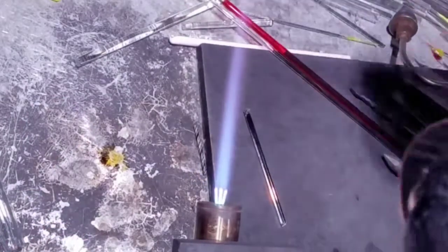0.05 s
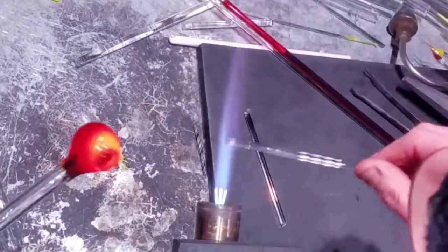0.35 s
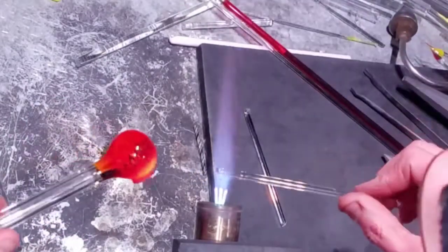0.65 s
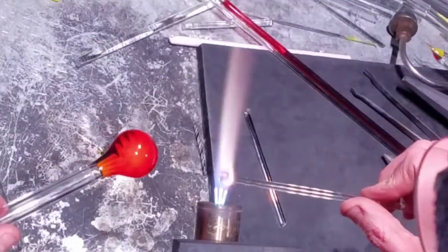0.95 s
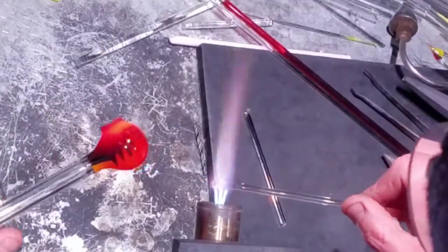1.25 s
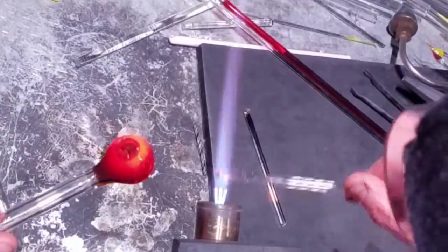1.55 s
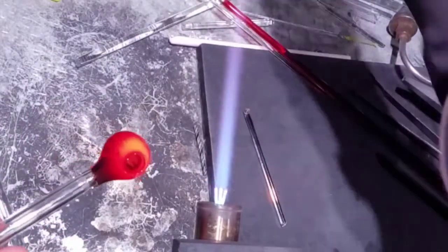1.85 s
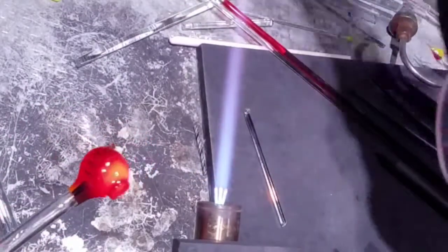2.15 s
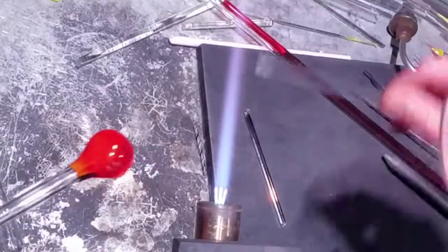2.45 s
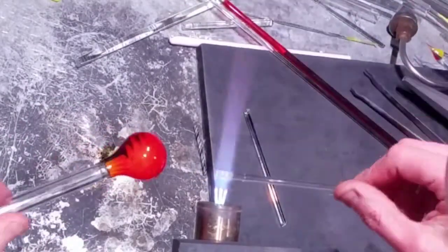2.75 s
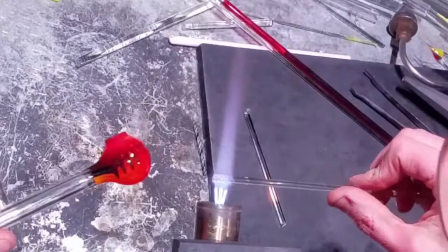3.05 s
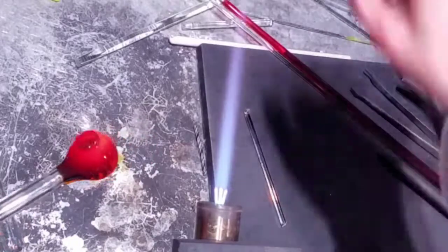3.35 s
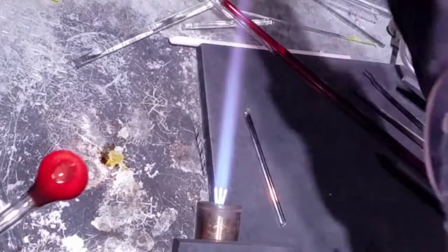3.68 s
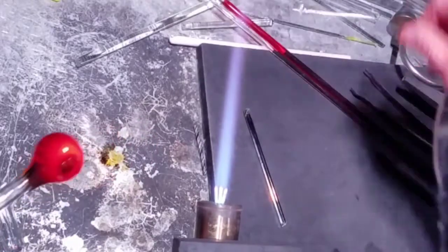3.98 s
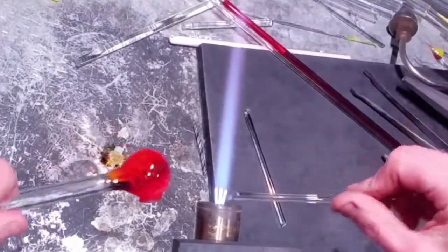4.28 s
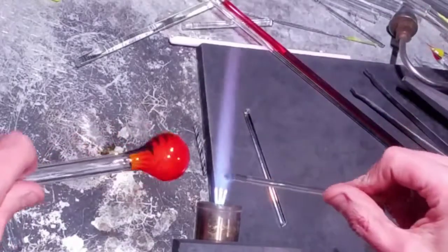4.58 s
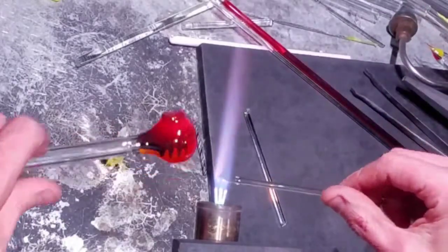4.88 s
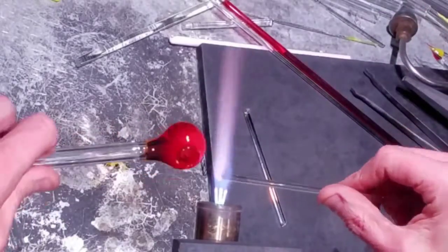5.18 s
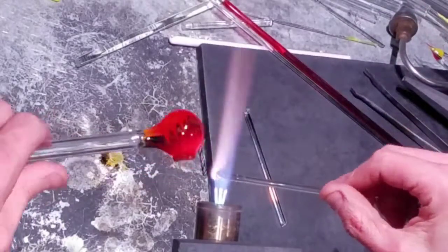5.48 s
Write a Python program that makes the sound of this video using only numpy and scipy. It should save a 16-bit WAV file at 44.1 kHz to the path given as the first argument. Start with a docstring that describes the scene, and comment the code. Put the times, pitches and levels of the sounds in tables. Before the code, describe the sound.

Glass rods drop and clink three times on a workbench, with light ticks and scrapes over a small torch's steady hiss.

```python
"""A small workshop, close to the bench, on a camera's stereo microphones; a small torch hisses throughout.
At once a glass rod drops against other glass and sets it ringing. Near 2 s rods tick and slide, and a
second drops. Around 3.5 s they knock and scrape on the bench, and a third drops just before 4 s.
After each loud clink the camera's gain control ducks the hiss and lets it swell back; meanwhile
the flame flares a little as a cold rod enters it."""
import sys
import numpy as np
from scipy import signal
from scipy.fft import rfft, irfft
from scipy.io import wavfile
from scipy.ndimage import uniform_filter1d, minimum_filter1d

SR = 44100
rng = np.random.default_rng(int(sys.argv[2]) if len(sys.argv) > 2 else 0)


def digitize_waveform(pressure):
    """Quantize a signal to 16-bit integers and store it at the path in sys.argv[1].

    Rows of a 2-D input are taken as channels; values are limited to [-1, 1].
    """
    field = np.atleast_2d(pressure).T
    bounded = np.clip(field, -1, 1)
    quanta = np.round(bounded * 32767).astype(np.int16)
    wavfile.write(sys.argv[1], SR, quanta)


N = 248266
TIME = np.arange(N) / SR
BINS = np.fft.rfftfreq(N, 1 / SR)

# A rod drops on the other glass. Each row: start in seconds, then ring, weight on the bench and
# chatter in dB, then the delay of the rebound in seconds.
DROPS = [(-.008, 1.5, -7.5, -3.5, 0.0094), (2.2912, 1, -14, -1.5, .01), (3.9184, -1.5, -2, -0.5, .006)]
# A rod knocks on the bench. Each row: start in seconds, ring of the bench in dB, crack in dB.
BENCH_KNOCKS = [(3.4695, -28.5, -20), (3.6624, -44.5, -24.5)]
# How alike the two microphones hear. Each row: frequency in Hz, correlation from 0 to 1.
MIC_LIKENESS = [(60, .93), (130, .92), (290, 0.84), (640, 0.5), (1400, 0), (15000, 0)]


def amp(db):
    """Decibels to gain."""
    return 10 ** (np.asarray(db) / 20)


def unit(x):
    """Scales to rms 1."""
    return x / np.sqrt(np.mean(x ** 2) + 1e-20)


def read(points, hz):
    """Reads a table on a log-frequency axis."""
    f, value = np.transpose(points)
    return np.interp(np.log(hz + 1), np.log(f + 1), value)


def add(mix, start, sound):
    """Mixes a stereo sound in at a start in seconds."""
    at = round(start * SR)
    sound = sound[:, max(-at, 0):]
    part = mix[:, max(at, 0):][:, :sound.shape[1]]
    part += sound[:, :part.shape[1]]


def pair(x, db=0):
    """Colours two unrelated signals and makes their bass alike, as at two closely spaced microphones."""
    hz = np.fft.rfftfreq(x.shape[1], 1 / SR)
    left, other = rfft(x)
    same = np.clip(read(MIC_LIKENESS, hz), -1, 1)
    right = same * left + np.sqrt(1 - same ** 2) * other
    return irfft(np.array([left, right]) * amp(db), x.shape[1])


def stroke(start, attack_s, length_s, t60):
    """Envelope of one movement: it rises, and dies away once its length is over."""
    t = TIME - start
    return np.clip(t / attack_s, 0, 1) * amp(-60 * np.maximum(t - length_s, 0) / t60)


def ring(hz, db, t60, fill_s, waver):
    """One dying mode; it builds up as its reflections gather, and their sum wavers at each microphone."""
    t = np.arange(int(SR * min(t60, 1))) / SR
    apart = np.sqrt(1 - np.clip(read(MIC_LIKENESS, hz), 0, 1))
    phase = 2 * np.pi * rng.random() + apart * rng.choice([-1, 1]) * np.array([[-1], [1]]) * np.pi / 4
    knots, knot_s = rng.standard_normal((2, 2, 90)), np.linspace(0, 1, 90)
    swell, slip = (np.array([np.interp(t, knot_s, mic) for mic in both]) for both in knots)
    envelope = amp(db - 60 * t / t60) * (1 - np.exp(-t / fill_s))
    return envelope * (1 + waver * swell) * np.cos(2 * np.pi * hz * t + phase + waver * slip)


def clinks():
    """The same glass is struck at three places, so each clink favours other modes."""
    # Each row: pitch in Hz, free t60 in seconds, relative dB in the first, second and third clink.
    glass_modes = [(2077, .3, -37, -26, -29), (2239, .33, -27, -19, -25), (2266, 1.15, -26, -27, -30),
                   (2299, .38, -17, -17, -25), (2331, .42, -18, -18, -14), (2372, .29, -16, -16, -23),
                   (2406, .33, -26, -17, -31), (2445, .29, -6, -1, -12), (2654, .37, -17, -18, -15),
                   (2670, .37, -21, -15, -23), (2836, .3, -16, -5, 2), (2860, .35, -8, -3, -6),
                   (2997, .3, -30, -21, -25), (3122, .85, -36, -28, -22), (3465, .33, -12, -13, -17),
                   (3481, .33, -13, -17, -14), (3595, .47, -25, -24, -28), (4002, .41, -16, -23, -17),
                   (4204, .32, -23, -16, -22), (4354, .45, -20, -16, -28), (4655, .32, -19, -18, -23),
                   (4785, .35, -35, -26, -44), (4936, .28, -11, -24, -27), (6578, .29, -31, -32, -26),
                   (7633, .3, -27, -26, -26), (7720, .3, -32, -31, -28), (10767, .24, -44, -39, -29),
                   (14432, .24, -38, -27, -20), (14475, .27, -36, -19, -29)]
    out = np.zeros((2, N))
    for hz, t60, *levels in glass_modes:
        neighbour_t60 = 1.28 * (2420 / hz) ** 0.55
        for (start, strength_db, *_), mode_db in zip(DROPS, levels):
            db = mode_db + strength_db
            # Rough and damped while the pieces touch, then free and clean, then the neighbouring glass.
            add(out, start, ring(hz, db - 3.5, t60=0.061, fill_s=0.00053, waver=0.54))
            add(out, start, ring(hz, db, t60, fill_s=0.011, waver=0.35))
            add(out, start, ring(hz, db - 30.5, neighbour_t60, fill_s=0.075, waver=0.089))
    return out


def chatter(room, start, db, tint, t60, room_db, rise_s=0.000096):
    """Hard glass chatters at a contact: a wide burst that the room prolongs. Gives (start, sound)."""
    # Colour common to all contacts. Each row: frequency in Hz, gain in dB.
    colour = [(30, -17), (170, -5), (380, 10), (1000, 3), (1500, 5), (2400, 6), (4400, 4.5), (5600, 1),
              (7600, 7.5), (9500, -2.5), (12000, 6), (14400, 9)]
    t, lead_s = np.arange(SR // 2) / SR, 0.01
    hz = np.fft.rfftfreq(len(t), 1 / SR)
    rise = np.clip((t - lead_s) / rise_s, 0, 1)
    envelope = rise * amp(db - 60 * np.maximum(t - lead_s - rise_s, 0) / t60)
    burst = pair(rng.standard_normal((2, len(t))) * envelope, read(colour, hz) + read(list(tint), hz))
    sound = amp(room_db) * reverberate(burst, room)
    add(sound, 0, burst)
    return start - lead_s, sound


def contacts(room):
    """A drop strikes and rebounds, a knock cracks and rattles, a touch ticks once."""
    # Colours of a drop's strike and of its rebound. Each row: frequency in Hz, gain in dB.
    strike_tint = [(250, 2.5), (390, -7.5), (600, 2), (950, 2.5), (1300, -4.5), (1700, -0.5), (2600, -4),
                   (4500, -2), (5600, -5.5), (7500, -5.5), (10500, 2), (14000, -7)]
    rebound_tint = [(300, -36), (1300, -31.5), (2000, -3), (2700, -1), (4500, -4.5), (5600, -6.5),
                    (7500, -6), (10500, -12), (14000, -11.5)]
    # Light touches. Each row: start in seconds, strength in dB, brightness in dB, t60 in seconds.
    touches = [(1.9986, -21, 8, 0.037), (2.033, -23, 0, 0.029), (2.048, -19.5, -3, 0.016),
               (2.097, -23, -1.5, 0.014), (2.1552, -14.5, 0, 0.0051), (2.2787, -23.5, 6, .01),
               (3.605, -27.5, 9.5, 0.093), (3.995, -32, -19, 0.04)]
    # Where the thud, click and fizz of a contact lie, in Hz.
    bands_hz = [650, 2570, 8800]
    out = np.zeros((2, N))
    for start, _, weight_db, db, rebound_s in DROPS:
        # A light landing weakens the strike fully below 800 Hz, not at all above 2400 Hz.
        tint = [(hz, level + np.interp(hz, [800, 2400], [weight_db, 0])) for hz, level in strike_tint]
        add(out, *chatter(room, start, db, tint, t60=0.052, room_db=-17.5))
        add(out, *chatter(room, start + rebound_s, db, rebound_tint, t60=0.1, room_db=-5, rise_s=0.00084))
    for start, _, db in BENCH_KNOCKS:
        crack, rattle = zip(bands_hz, (0, 1, -31)), zip(bands_hz, (-11.5, -10.5, -30))
        add(out, *chatter(room, start, db, crack, t60=0.039, room_db=0))
        add(out, *chatter(room, start + 0.009, db, rattle, t60=0.092, room_db=4.6, rise_s=0.0036))
    for start, db, bright_db, t60 in touches:
        tint = zip(bands_hz, (-11.5 - bright_db, 0, -11.5 + bright_db))
        add(out, *chatter(room, start, db, tint, t60, room_db=-0.5, rise_s=0.058 * t60))
    return out


def thuds(sway_radians=1.99):
    """Each landing shakes the bench and the camera, whose two microphones sway out of step."""
    # Heavily damped bench modes. Each row: pitch in Hz, relative level in dB, t60 in seconds.
    thud_modes = [(48, -39, 0.066), (115, -13, 0.033), (175.5, -5, 0.023), (390, 5, 0.026),
                  (1037, -1.5, 0.023)]
    out, t = np.zeros((2, N)), np.arange(SR // 4) / SR
    phase = np.array([[0], [sway_radians]])
    thud = sum(amp(db - 60 * t / t60) * np.sin(2 * np.pi * hz * t + phase) for hz, db, t60 in thud_modes)
    for start, _, weight_db, *_ in DROPS:
        add(out, start, amp(weight_db) * thud * (1 - np.exp(-t / 0.00054)))
    return out


def knocks(room):
    """A rod held in the fingers, or the spot it touches, rings briefly; a knock rings the bench top."""
    # Each row: start in seconds, pitch in Hz, level in dB, t60 in seconds.
    chinks = [(1.9977, 2880, -28.5, 0.077), (1.9987, 6740, -20.5, 0.054), (2.295, 397, -38.5, 0.82),
              (3.607, 2910, -35, 0.18), (3.607, 3680, -35, 0.054), (3.613, 4210, -30.5, 0.23),
              (3.6625, 2215, -19.5, 0.045), (3.67, 783, -28, 0.13), (3.688, 2700, -24, 0.047),
              (3.994, 535, -28, 0.096)]
    # Each row: pitch in Hz, relative level in dB, t60 in seconds.
    bench_modes = [(323.5, -4.5, 0.2), (445, -22, 0.18), (541, -1.5, 0.18), (608, 2, 0.13), (822, -6, 0.41),
                   (1136, 8, 0.1), (1225, -3, 0.2), (2016, 8, 0.12), (2110, 0.5, 0.2)]
    out = np.zeros((2, N))
    for start, hz, db, t60 in chinks:
        add(out, start, ring(hz, db, t60, fill_s=0.00034, waver=0.79))
    for start, blow_db, _ in BENCH_KNOCKS:
        for hz, db, t60 in bench_modes:
            add(out, start, ring(hz, blow_db + db, t60, fill_s=0.00099, waver=0.95))
    return out + amp(-8) * reverberate(out, room)


def slides(room, grain_db=2.0, attack_s=0.024):
    """Glass dragged over the gritty bench: a hiss made of many small catches."""
    # Each row: start and length in seconds, relative level in dB, run-out t60 in seconds.
    pushes = [(1.989, 0.033, -48.5, 0.94), (2.179, .3, -42.5, 0.57), (3.464, 0.031, -32, 0.42),
              (3.614, 0.02, -62, 0.37), (3.771, 0.084, -45.5, 0.16), (4.04, 0.062, -44, 0.18)]
    # Each row: frequency in Hz, gain in dB.
    scrape_colour = [(50, -13.5), (300, -1.5), (750, -1), (1500, -2.5), (2500, 1.5), (4500, -7.5),
                     (7000, -7.5), (9500, -12.5), (13500, -8)]
    catches = amp(grain_db * unit(uniform_filter1d(rng.standard_normal(N), size=130)))
    push = sum(amp(db) * stroke(start, attack_s, length, t60) for start, length, db, t60 in pushes)
    scrape = unit(pair(rng.standard_normal((2, N)) * catches, read(scrape_colour, BINS))) * push
    return amp(5.0) * scrape + amp(2.0) * reverberate(scrape, room)


def torch(level_db=-44.5, flutter_db=-0.82, rumble_hz=140, rumble_db=1):
    """Gas rushes through the nozzle; the flame flutters slightly and rumbles below."""
    # Each row: frequency in Hz, relative level in dB.
    hiss_colour = [(25, -22), (48, -9.5), (75, 1), (118, -1.5), (175, -5), (320, 1.5), (700, -1),
                   (1500, -3), (2400, -1), (3600, -5.5), (5500, -10.5), (7600, -10), (9400, -21),
                   (13000, -13)]
    # Each row: centre in Hz, width in Hz, rise in dB.
    resonances = [(118.2, 3.3, 10.3), (238.1, 4.4, 11.7), (322, 9, 8.8), (409.6, 7.7, 9.1),
                  (710, 10.2, 8.7), (2130, 33, 6.7), (2245, 19, 10.7), (2378, 60, 7.6), (2630, 21, 11)]
    # Each row: frequency in Hz, left microphone minus right in dB.
    balance = [(60, 1), (380, -1), (1300, -2), (2400, -1.5), (4400, -4.5), (8100, -2), (14000, 3.5)]
    # The rumble swells as an arm sweeps past the flame.
    # Each row: start in seconds, level in dB against the bass of the hiss, t60 in seconds.
    sweeps = [(-.03, 22.5, 1.9), (3.42, -15, .8), (3.99, 18.5, .4)]
    # A cold rod enters the flame. Each row: start in seconds, added rush in dB against the steady hiss.
    flares = [(.63, -13.5), (2.62, -7.5), (4.6, -15.5)]
    peaks_db = sum(rise / (1 + (2 * (BINS - hz) / width) ** 2) for hz, width, rise in resonances)
    sides_db = np.array([[0.5], [-0.5]]) * read(balance, BINS)
    hiss = unit(pair(rng.standard_normal((2, N)), read(hiss_colour, BINS) + peaks_db + sides_db))
    bass = irfft(rfft(hiss) / (1 + (BINS / rumble_hz) ** 4), N)
    flutter = unit(uniform_filter1d(rng.standard_normal(N), size=2500))
    swell = sum(amp(db) * stroke(start, attack_s=0.087, length_s=0.077, t60=t60)
                for start, db, t60 in sweeps)
    flare = sum(amp(db) * stroke(start, attack_s=0.04, length_s=0.16, t60=3.7) for start, db in flares)
    rumble = bass * (amp(rumble_db) + swell - 1)  # the hiss already holds this bass once
    return amp(level_db + flutter_db * flutter) * (hiss * (1 + flare) + rumble)


def room_response():
    """The workshop: dense reflections after a short gap, each band dying at its own speed."""
    # Each row: frequency in Hz, t60 in seconds.
    decay_times = [(150, 0.73), (600, 0.98), (2500, 0.49), (6000, 0.36), (13000, 0.31)]
    hz, t, bands = signal.stft(rng.standard_normal((2, SR // 2)), SR, nperseg=256)
    _, tail = signal.istft(bands * amp(-60 * t / read(decay_times, hz)[:, None]), SR, nperseg=256)
    onset = np.clip(np.arange(tail.shape[1]) / SR / 0.00087 - 0.5, 0, 1)
    tail = pair(tail * onset)
    return tail / np.linalg.norm(tail[0])


def reverberate(x, room):
    """The room's answer to a stereo sound."""
    return signal.fftconvolve(x, room, axes=1)[:, :N]


def scene():
    """Torch, glass and bench as they reach the two microphones."""
    room = room_response()
    return torch() + clinks() + thuds() + knocks(room) + contacts(room) + slides(room)


def gain_control(x, threshold_db=-21, depth_db=10, hold_s=0.52, release_s=0.52):
    """Loud sound turns the gain down at once; it stays down a while, then creeps back."""
    power = uniform_filter1d((x ** 2).mean(0), size=130)
    level_db = 10 * np.log10(abs(power) + 1e-12)
    cut_db = np.clip(level_db - threshold_db, 1e-3, depth_db)
    span = 2 * int(hold_s * SR / 2) + 1
    held_db = -minimum_filter1d(-cut_db, span, origin=span // 2, mode="nearest")
    # The cut shrinks exponentially until a deeper one takes over.
    decay = TIME / release_s
    recovering_db = np.exp(np.maximum.accumulate(np.log(held_db) + decay) - decay)
    return x * amp(-recovering_db)


def record(dry):
    """The camera: gain control, a limit at full scale and a steep cut of the highest treble."""
    limited = np.clip(gain_control(dry), -1, 1)
    lowpass = signal.firwin(601, cutoff=14620, window=("kaiser", 8), fs=SR)
    return signal.oaconvolve(limited, lowpass[None], "same")


dry = scene()
out = record(dry)
digitize_waveform(out)
```